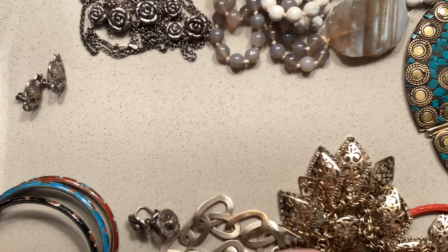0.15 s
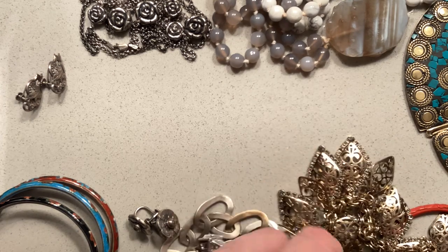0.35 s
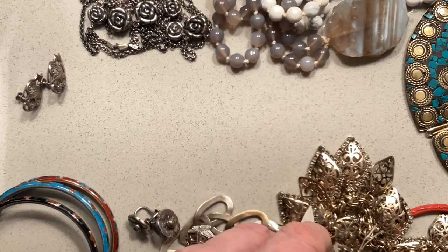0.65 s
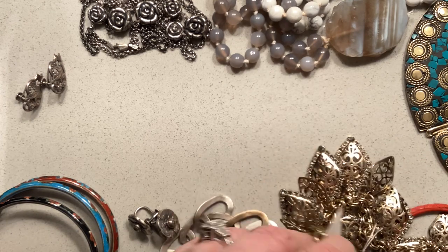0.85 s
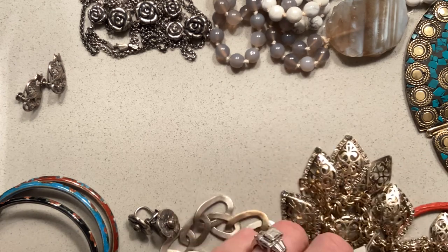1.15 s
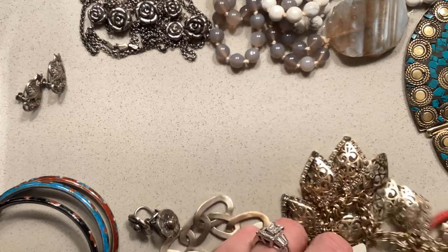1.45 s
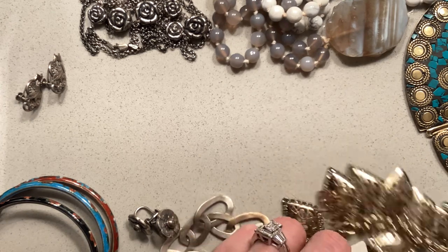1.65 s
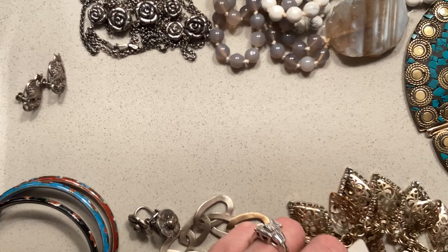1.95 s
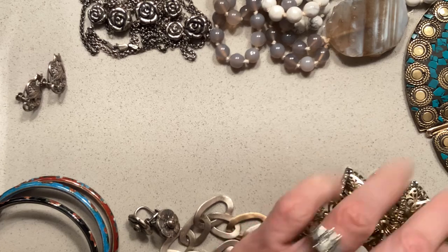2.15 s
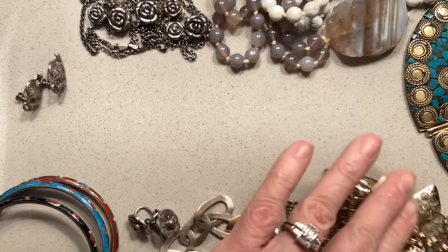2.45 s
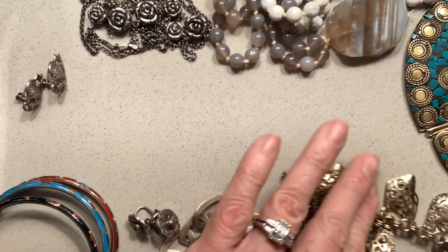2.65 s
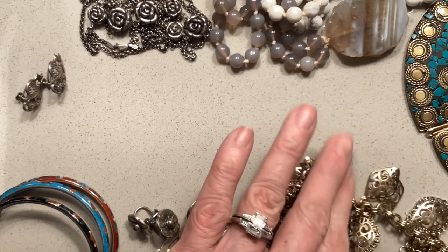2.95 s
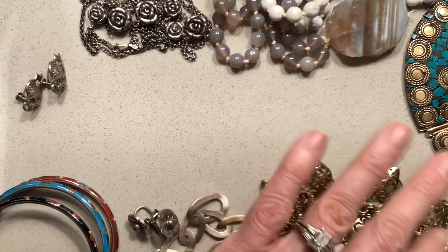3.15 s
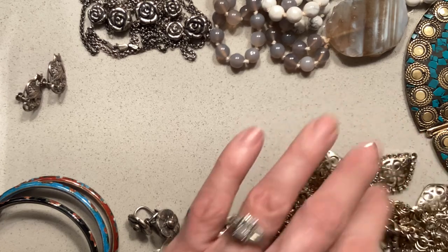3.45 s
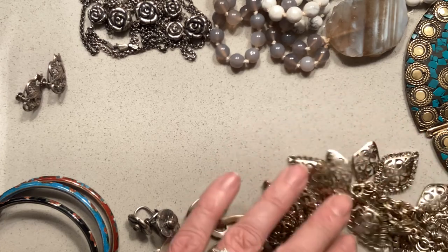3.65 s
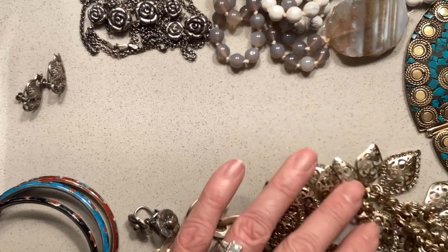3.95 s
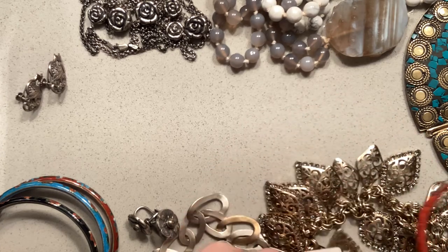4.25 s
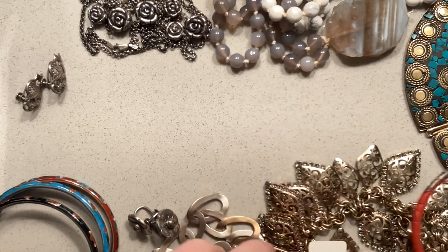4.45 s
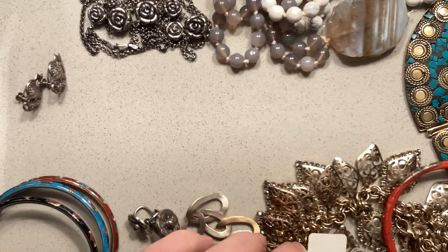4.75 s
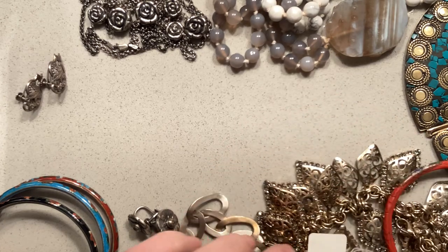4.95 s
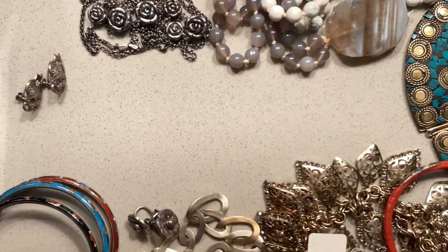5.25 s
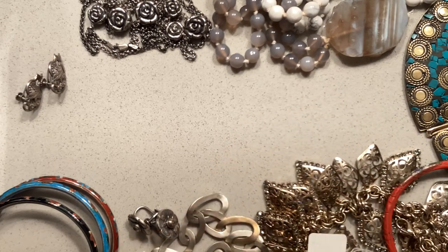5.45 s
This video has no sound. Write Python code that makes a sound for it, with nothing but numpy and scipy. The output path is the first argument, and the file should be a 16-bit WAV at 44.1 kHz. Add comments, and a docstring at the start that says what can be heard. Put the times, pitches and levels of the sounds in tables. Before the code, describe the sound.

Thin metal leaves and links click, scrape and jingle irregularly on a counter in a quiet room, then a chain drops sharply.

```python
"""Metal necklace pushed over a countertop

A hand pushes metal leaves and chain links over a counter. Noise-like grains make the rustle and fizz of dragging;
short noise bursts and decaying sines make link clicks, edge skids and leaf slaps; gliding sines make squeaks.
At last a length of chain drops in two bright clatters. Resonators ring the leaves and the counter.
A small dry room answers with decaying noise and hums faintly.
"""
import sys
import numpy as np
from scipy import signal
from scipy.fft import rfft, irfft, next_fast_len
from scipy.io import wavfile
from scipy.ndimage import map_coordinates

SR = 44100
rng = np.random.default_rng(int(sys.argv[2]) if len(sys.argv) > 2 else 0)


def master(y):
    """Save y as 16-bit WAV."""
    cut = np.clip(np.atleast_2d(y).T, -1, 1)
    pcm = np.round(cut * 32767)  # scale
    wavfile.write(sys.argv[1], SR, pcm.astype(np.int16))


N = 246164
TIME = np.arange(N) / SR
TOP_HZ = 15680  # band limit

# hand pushes: (start [s], length [s], rustle [dB], fizz [dB], weight on the counter [dB])
PUSH_EVENTS = [(0.0, 0.068, -62, -67, -73.5), (0.105, 0.0039, -48.5, -57.5, -54),
               (0.147, 0.28, -61.5, -64.5, -72), (0.194, 0.014, -72, -70, -68),
               (0.297, 0.05, -55.5, -70, -56.5), (0.519, 0.16, -63, -78, -63.5),
               (0.529, 0.07, -51, -57.5, -59), (0.772, 0.02, -45.5, -51.5, -48.5),
               (0.858, 0.068, -51, -51, -54), (1.026, 0.072, -60, -47.5, -71),
               (1.061, 0.057, -44, -52.5, -51), (1.219, 0.067, -63, -64, -54.5),
               (1.316, 0.057, -59.5, -82, -61.5), (1.427, 0.49, -51, -57.5, -58.5),
               (1.483, 0.052, -47, -44, -46.5), (1.667, 0.023, -44, -58, -57.5),
               (1.744, 0.012, -47.5, -52, -56), (1.811, 0.0055, -54, -69, -48.5),
               (1.932, 0.082, -60, -55, -61.5), (2.096, 0.043, -65.5, -87, -68),
               (2.19, 0.06, -59, -66, -70.5), (2.248, 0.0075, -42, -55, -51.5),
               (2.27, 0.08, -50.5, -55, -54.5), (2.339, 0.014, -46, -35, -56),
               (2.345, 0.32, -50, -59.5, -52.5), (2.444, 0.0023, -43.5, -42, -41.5),
               (2.571, 0.22, -51, -52, -64.5), (2.7, 0.061, -44, -44.5, -46.5),
               (2.766, 0.14, -51, -58.5, -58), (2.966, 0.011, -55.5, -52, -57),
               (3.013, 0.045, -50.5, -53, -54.5), (3.159, 0.22, -53, -68, -60.5),
               (3.185, 0.022, -48.5, -60, -56.5), (3.33, 0.017, -49, -50, -53),
               (3.613, 0.0099, -38.5, -49, -45), (3.634, 0.091, -51.5, -56.5, -60.5),
               (3.919, 0.006, -61, -51, -53.5), (3.947, 0.0036, -44, -64, -56.5),
               (4.198, 0.076, -56.5, -61, -66), (4.298, 0.01, -46.5, -44, -44),
               (4.323, 0.098, -74, -62, -88), (4.479, 0.05, -57, -71, -63.5),
               (4.527, 0.008, -50, -46, -43.5), (4.549, 0.058, -65.5, -52.5, -59.5),
               (4.635, 0.095, -65.5, -70, -59), (4.723, 0.008, -48, -53, -51.5)]
# chain lengths landing: (time [s], length [s], first link level [dB], chime against clack [dB])
CHAIN_FALLS = [(4.746, 0.029, -9.5, -2), (4.7819, .04, -6, 4.5)]
# leaf resonances: (frequency [Hz], width [Hz], level [dB])
LEAF_RESONANCES = [(1085, 55, -4.5), (1420, 160, -11), (2055, 30, -1.5), (2118, 30, -3), (2615, 35, 0),
                   (3320, 50, -7), (3840, 50, -2), (4380, 50, -6), (5030, 50, -2), (5230, 55, 3),
                   (5630, 60, -1), (6330, 50, -1), (6930, 60, -3), (7940, 85, -2)]
# spectrum of the counter: (frequency [Hz], level [dB])
COUNTER_COLOUR = [(110, -19), (170, 4), (240, -1.5), (330, 8), (450, -1.5), (750, 3), (1100, -9.5),
                  (1500, -1), (2400, -21)]
# spectrum of loose links and edge cracks: (frequency [Hz], level [dB])
JINGLE_COLOUR = [(1500, 0), (2600, 1.5), (6000, -1), (9000, -4.5), (15000, -3.5)]


def amp(db):
    """Decibels to gain."""
    return 10 ** (np.asarray(db) / 20)


def unit(x):
    """Scale to rms 1."""
    return x / np.sqrt(np.mean(x ** 2) + 1e-20)


def to_peak(x):
    """Scale to a peak of 1."""
    return x / np.abs(x).max()


def along(points, hz):
    """Interpolate (Hz, value) points on a log frequency axis."""
    f, v = np.transpose(points)
    return np.interp(np.log(hz + 1), np.log(f + 1), v)


def fade(t, t60):
    """Exponential decay, 60 dB down after t60."""
    return np.exp(-np.log(1000) * t / np.maximum(t60, 1e-4))


def add(track, s, x):
    """Mix x into the track from time s."""
    part = track[max(round(s * SR), 0):][:len(x)]
    part += x[:len(part)]


def random_sign(shape=None):
    """Random polarity."""
    return rng.choice([-1, 1], shape)


def filtered(x, response):
    """x times a complex response of frequency."""
    size = next_fast_len(len(x) + 8192)
    spectrum = rfft(x, size) * response(np.fft.rfftfreq(size, 1 / SR))
    return irfft(spectrum, size)[:len(x)]


def coloured(x, points, size=2048):
    """x through a minimum-phase filter with the given spectrum, falling away below its first point."""
    hz = np.fft.rfftfreq(size, 1 / SR)
    gain = amp(along(points, hz)) * np.minimum(hz / points[0][0], 1) ** 2
    # fold the cepstrum to make the filter causal
    cepstrum = irfft(np.log(np.maximum(gain, 1e-6)))
    cepstrum[1:size // 2] *= 2
    cepstrum[size // 2 + 1:] = 0
    impulse_response = irfft(np.exp(rfft(cepstrum)))
    return signal.fftconvolve(x, impulse_response)[:len(x)]


def resonant(x, modes):
    """The ringing of a body with the given modes when x shakes it."""
    def response(f):
        return sum(amp(db) * 1j * f * width / (centre ** 2 - f * f + 1j * f * width)
                   for centre, width, db in modes)
    return filtered(x, response)


def wobble(rate):
    """A smooth random curve, rate knots a second."""
    return map_coordinates(rng.standard_normal(int(N * rate / SR) + 4), [TIME * rate])


def grains(rate, spread_db):
    """Tiny random impacts of uneven size, rate a second."""
    hit = rng.random(N) < rate / SR
    size = amp(spread_db * np.minimum(rng.standard_exponential(N), 3))
    return hit * size * np.sign(rng.standard_normal(N))


def burst(t60, size=4096):
    """The dense, quickly dying vibration of a small struck part, as decaying noise."""
    return rng.standard_normal(size) * fade(np.arange(size) / SR, t60)


def link_ring(t60, order=40, size=4096):
    """Small-link ringing: sines of random pitch, each with its own damping."""
    t = np.arange(size) / SR
    hz = rng.uniform(1500, TOP_HZ, (order, 1))
    life = t60 * np.exp(0.055 * rng.standard_normal((order, 1)))
    partials = rng.standard_normal((order, 1)) * np.sin(2 * np.pi * hz * t) * fade(t, life)
    return unit(partials.sum(0))


def chatter(x, gap_s=0.0015, loss_db=2.5, count=4):
    """A part rebounds a few times within milliseconds, weaker each time."""
    delays = np.cumsum(gap_s * rng.uniform(0.47, 2.0, count))
    out = x.copy()
    for k, delay in enumerate(delays):
        rebound = np.pad(x, (int(delay * SR), 0))[:len(x)]
        out += amp(-loss_db * (k + 3.5)) * random_sign() * rebound
    return out


def room_tone(level_db=-61, waver_db=-0.5):
    """Low, slightly uneven ventilation rumble with a trace of hiss, as shaped noise."""
    # (frequency [Hz], level [dB])
    tone_colour = [(25, -47), (42, -28), (56, -7), (90, -1), (120, 1), (170, -5), (290, -16), (450, -29),
                   (900, -30.5), (1800, -29.5), (2600, -32.5), (6000, -38.5), (12000, -44), (16000, -50)]
    noise = unit(filtered(rng.standard_normal(N), lambda hz: amp(along(tone_colour, hz))))
    low = filtered(noise, lambda hz: hz < 300)
    return amp(level_db) * (noise + low * (amp(waver_db * wobble(8.5)) - 1))


def room(x, build_up_s=0.0071, far_db=-26, far_t60_s=0.21):
    """Nearby surfaces return a short, dense answer; the far walls a faint, longer one."""
    # decay of the near answer: (frequency [Hz], t60 [s])
    near_decay = [(150, 0.33), (400, 0.2), (1000, 0.13), (2500, 0.046), (6000, 0.034), (14000, 0.055)]
    hz, t, z = signal.stft(rng.standard_normal(SR // 2), SR, nperseg=256)
    near = fade(t, along(near_decay, hz)[:, None])
    far = amp(far_db) * fade(t, far_t60_s)
    tail = signal.istft(z * (near + far), SR, nperseg=256)[1]
    tail *= 1 - np.exp(-(np.arange(len(tail)) / SR / build_up_s) ** 2)
    return signal.fftconvolve(x, tail / np.linalg.norm(tail))[:N]


def knocks(t60_s=0.065, lag_s=0.0038, fall_db=-37.5):
    """The counter answers the start of each push and each chain fall with a dull noise burst."""
    out = np.zeros(N)
    blows = [(s + lag_s, weight_db) for s, *_, weight_db in PUSH_EVENTS]
    blows += [(s, fall_db) for s, *_ in CHAIN_FALLS]
    for s, db in blows:
        add(out, s, amp(db) * to_peak(coloured(burst(t60_s, size=8192), COUNTER_COLOUR)))
    return out


def squeaks(waver_hz=70):
    """A sticking and slipping edge sings for a moment on one unsteady high mode."""
    # (time [s], length [s], mean pitch [Hz], level [dB])
    squeak_events = [(1.75, 0.021, 15050, -39), (1.83, 0.009, 14100, -36.5), (2.649, 0.021, 14000, -41),
                     (3.335, 0.016, 14900, -39), (3.616, 0.0093, 14400, -36), (3.625, 0.01, 14700, -40.5),
                     (3.626, 0.0068, 11400, -33)]
    out = np.zeros(N)
    for s, length, hz, db in squeak_events:
        t = np.arange(int(length * SR)) / SR
        pitch = hz + waver_hz * map_coordinates(rng.standard_normal(64), [t * 500])
        swell = np.sqrt(np.abs(np.sin(np.pi * t / length)))
        add(out, s, amp(db) * swell * np.sin(2 * np.pi * np.cumsum(pitch) / SR))
    return out


def skids(gap_s=0.0014, edge_t60_s=0.009, crack_db=-3, crack_t60_s=0.0022, scatter_db=2, size=2048):
    """An edge skids over a leaf: a swelling, fading roll of contacts strikes its short, inharmonic modes."""
    # (time [s], length [s], level [dB], nominal lowest mode [Hz])
    skid_events = [(0.096, 0.015, -40.5, 2600), (0.531, 0.0049, -43, 3100), (0.56, 0.0067, -42.5, 3380),
                   (0.862, 0.012, -42, 2460), (0.874, 0.0085, -25, 2478), (1.022, 0.004, -29.5, 2780),
                   (1.077, 0.012, -27, 3340), (1.112, 0.007, -24.5, 3350), (1.498, 0.027, -30, 3170),
                   (1.829, 0.0058, -36, 3230), (1.979, 0.008, -32, 4350), (2.249, 0.0094, -28.5, 3330),
                   (2.352, 0.011, -29, 2980), (2.443, 0.011, -33, 2300), (2.71, 0.0073, -28.5, 2070),
                   (2.732, 0.0065, -34, 3240), (3.607, 0.013, -30, 2080), (3.952, 0.0075, -26.5, 2340),
                   (4.194, 0.0039, -26.5, 3410), (4.229, 0.0063, -22, 3890), (4.482, 0.011, -38, 3360),
                   (4.534, 0.0085, -33, 3250)]
    # (multiple of the lowest mode, level [dB])
    edge_modes = [(1, -2), (1.63, 0), (2.12, -1), (2.65, -3), (3.7, -8.5)]
    out = np.zeros(N)
    t = np.arange(size) / SR
    ratio, level = np.transpose(edge_modes)[:, :, None]
    for s, length, db, lowest_hz in skid_events:
        hz = lowest_hz * ratio * (1 + .025 * rng.standard_normal(ratio.shape))
        delays = np.r_[0, np.cumsum(gap_s * rng.uniform(.5, 1.5, 40))]
        shape = (len(delays), len(ratio), 1)
        strikes = amp(level + scatter_db * rng.standard_normal(shape)) * random_sign(shape)
        crack = amp(crack_db) * coloured(burst(crack_t60_s, size), JINGLE_COLOUR)
        roll = np.zeros(2 * size)
        for delay, strike in zip(delays[delays < length], strikes):
            ring = (strike * np.sin(2 * np.pi * hz * t)).sum(0) * fade(t, edge_t60_s)
            swell = np.sin(np.pi * (delay + gap_s) / (length + 2 * gap_s))
            add(roll, delay, swell * (ring + crack))
        add(out, s, amp(db) * to_peak(roll))
    return out


def slaps(contact_t60_s=0.00065, scrape_db=-9, bloom_s=0.0018, scatter_db=5.0, size=8192):
    """A leaf lands flat with a sharp, broad clack; its modes bloom and ring out, differently each time."""
    # (time [s], clack level [dB], ringing level [dB])
    slap_events = [(0.881, -25, -36.5), (2.2527, -43, -41), (2.431, -10.5, -22), (2.6998, -18.5, -26),
                   (2.7554, -40, -35), (2.8731, -22.5, -37), (3.6078, -19, -42), (3.925, -30, -37),
                   (3.9526, -26.5, -57), (4.755, -26, -32.5), (4.796, -23, -29)]
    # (frequency [Hz], level [dB])
    slap_colour = [(600, -21), (1100, -11), (2300, 3), (2800, -5), (4200, -4.5), (6500, -1), (8500, -19),
                   (15000, -15)]
    damping_hz = 6.6  # width that lying on the counter adds to a 1 kHz mode; grows with pitch squared
    out = np.zeros(N)
    t = np.arange(size) / SR
    hz, width, level = np.transpose(LEAF_RESONANCES)[:, :, None]
    decay = np.exp(-np.pi * (width + damping_hz * (hz / 1000) ** 2) * t)
    bloom = 1 - np.exp(-t / bloom_s)
    for s, clack_db, ring_db in slap_events:
        contact = signal.unit_impulse(size) + amp(scrape_db) * burst(contact_t60_s, size)
        clack = to_peak(chatter(coloured(contact, slap_colour)))
        sizes = amp(level + scatter_db * rng.standard_normal(hz.shape)) * random_sign(hz.shape)
        ring = (sizes * np.sin(2 * np.pi * hz * t) * decay).sum(0) * bloom
        add(out, s, amp(clack_db) * clack + amp(ring_db) * .5 * ring)
    return out


def chain_drop(clack_t60_s=0.023, chime_t60_s=0.0049, crack_t60_s=0.0027, crack_db=-12,
               scatter_db=1, count=10):
    """Link after link cracks onto the counter, clacks and chimes high up, ever more softly."""
    # both: (frequency [Hz], level [dB])
    clack_colour = [(300, -14.5), (1500, -12.5), (3000, -13), (4200, -8.5), (5600, -1), (7300, -8.5),
                    (8300, 1.5), (10500, -5), (14000, -15), (16000, -6)]
    chime_colour = [(7000, -32), (10750, -20), (11150, 0), (12000, -4), (13000, -7), (13900, -20),
                    (16000, -28)]
    link_gap_s, follow_db, settle_db_per_s = .005, -6, 153.5
    out = np.zeros(N)
    for s, length, db, chime_db in CHAIN_FALLS:
        for k in range(count):
            delay, follower_db = 0, 0
            if k:
                delay = link_gap_s * (k + rng.uniform(-.35, .35))
                follower_db = follow_db - settle_db_per_s * delay + scatter_db * rng.standard_normal()
            clack = unit(coloured(burst(clack_t60_s), clack_colour))
            crack = unit(coloured(burst(crack_t60_s), clack_colour))
            chime = unit(coloured(burst(chime_t60_s), chime_colour))
            link = to_peak(clack + amp(crack_db) * crack + amp(chime_db) * chime)
            add(out, s + delay, (delay < length) * amp(db + follower_db) * link)
    return out


def clicks(tick_t60_s=0.0042, ring_t60_s=0.022, graze_t60_s=0.0184, note_cycles=100, overtone_db=-6,
           tick_db=-3, ring_db=-18, graze_db=-19):
    """Links graze, meet in a chatter of sharp ticks, then ring on a main note and an inharmonic overtone."""
    # (time [s], level [dB], main note [Hz], tilt [dB per octave], lowest link frequency [Hz])
    contact_events = [(0.0094, -42.5, 5200, -1, 2000), (0.0336, -41, 5130, -4, 2500),
                      (0.096, -36.5, 5000, 2.5, 900), (0.183, -35, 8000, -6, 1510),
                      (0.1944, -35, 7910, -4, 1540), (0.2872, -38, 5240, 6, 1500),
                      (0.3341, -40, 10900, 8, 4000), (0.3494, -44, 11900, 3, 4000),
                      (0.394, -37, 5120, -2, 1500), (0.512, -44, 5200, -4.5, 900),
                      (0.5462, -31, 5080, 24, 1500), (0.5986, -36, 4040, 13, 1500),
                      (0.651, -39.5, 5340, -7, 1500), (0.7655, -35, 2065, -6, 890),
                      (0.7748, -38, 3760, 0, 1800), (0.8645, -29.5, 2380, -7, 2000),
                      (0.8824, -26, 2027, -10.5, 1640), (0.973, -33, 2590, -12.5, 2520),
                      (0.995, -37.5, 2600, -6, 2500), (1.008, -27, 2760, -3, 2700),
                      (1.0399, -32, 2460, -3, 2400), (1.113, -21.5, 9740, -3, 2620),
                      (1.217, -46, 5200, -10, 1200), (1.2481, -47, 5600, 2, 1200),
                      (1.272, -36, 6240, -6.5, 1800), (1.3188, -28.5, 5000, 3.5, 4180),
                      (1.326, -35, 5760, -4, 4500), (1.333, -37, 6560, 5, 4500),
                      (1.4857, -32, 6260, -4, 3000), (1.502, -33, 5600, 4, 2000),
                      (1.53, -33, 10900, 2, 3000), (1.6005, -36, 11400, 4, 4970),
                      (1.637, -39, 7900, 1, 5000), (1.6727, -29.5, 10950, -5, 5000),
                      (1.6801, -32.5, 7000, -13.5, 5060), (1.6845, -42, 7060, -6, 5500),
                      (1.695, -31, 6850, 1, 3000), (1.716, -32.5, 6900, -9, 4000),
                      (1.804, -29.5, 3930, -8, 1190), (1.8323, -28, 7550, -4.5, 1510),
                      (1.847, -43, 5540, 9, 3000), (1.888, -34.5, 5760, -11, 1500),
                      (1.966, -26, 5030, 19, 3000), (1.9669, -18.5, 7500, -4.5, 2920),
                      (1.9732, -26, 7800, -4, 3950), (1.98, -28, 7100, -3, 4000),
                      (2.006, -34.5, 5200, 3, 3060), (2.1932, -43, 3920, -4.5, 2060),
                      (2.2545, -27, 4100, -1.5, 1610), (2.3405, -43, 10500, -3, 3000),
                      (2.349, -21, 13400, 10, 4000), (2.3554, -27, 6300, -7, 1840),
                      (2.4521, -25.5, 2670, 5, 1800), (2.502, -28, 5360, -3, 2000),
                      (2.5159, -25.5, 3690, -6.5, 1480), (2.596, -42, 10900, 6, 4000),
                      (2.626, -27, 5500, 20, 2980), (2.64, -32.5, 9200, 3, 3950),
                      (2.6993, -23, 7260, 8, 3000), (2.793, -28, 5300, 6, 2000),
                      (2.819, -38, 9100, 3, 3520), (2.872, -27, 5050, -4.5, 2000),
                      (2.8852, -30, 5040, -8, 2000), (2.9801, -30, 5870, -6, 1980),
                      (3.0164, -33.5, 2020, -9.5, 1180), (3.0312, -31, 5460, -4, 1520),
                      (3.0835, -39, 5560, -7, 2000), (3.1581, -31.5, 5200, -2, 1500),
                      (3.189, -26.5, 3900, -7.5, 3050), (3.609, -21, 6180, 5, 1500),
                      (3.6235, -20, 11240, -3.5, 1500), (3.697, -24, 5900, -4, 3470),
                      (3.7113, -23.5, 5560, -7, 3440), (3.7944, -41, 5100, -5.5, 1530),
                      (3.92, -29.5, 5700, -5.5, 1140), (3.9535, -25, 11820, 0.5, 2490),
                      (4.1835, -40, 5070, -1.5, 3020), (4.197, -20.5, 8830, -5.5, 3300),
                      (4.215, -34, 8600, -6, 3960), (4.2242, -23.5, 6900, -4, 3300),
                      (4.231, -19, 12400, 0, 3460), (4.2434, -35.5, 7760, -14, 3280),
                      (4.3056, -26, 9900, 4, 1500), (4.3924, -29, 4750, -2, 2500),
                      (4.408, -39.5, 8200, -4, 4000), (4.419, -34.5, 5300, -2.5, 3020),
                      (4.432, -40, 7540, -6, 3000), (4.444, -43, 8500, -5, 4000),
                      (4.4585, -35, 6050, -3, 3020), (4.476, -36, 4950, -3, 3050),
                      (4.4934, -31, 5300, -9, 3050), (4.523, -33.5, 4200, -1, 1960),
                      (4.5316, -26, 9140, 11, 2000), (4.651, -35.5, 5300, -3.5, 3060),
                      (4.66, -40.5, 7650, -4, 4000), (4.6747, -33.5, 5130, -6, 2500)]
    # (frequency [Hz], level [dB])
    link_colour = [(700, -3), (1600, -3.5), (2800, -6), (5000, 0.5), (7500, 1), (10500, -1), (15500, -3.5)]
    # note level, stronger or weaker by pitch: (main note [Hz], level [dB])
    note_levels = [(2000, -13), (2700, -9.5), (5000, -12.5), (11000, -5)]
    low_cut_db_per_octave, low_cut_depth_db = 22, 26.5  # a small link gives off little below its lowest
    note_lift_db, note_width_octaves = 8.5, 0.12  # a contact is strongest around its main note
    out = np.zeros(N)
    grid = np.geomspace(700, 16000, 24)
    for s, db, hz, tilt, lowest_hz in contact_events:
        octaves = np.log2(grid / hz)
        low_cut = np.clip(low_cut_db_per_octave * np.log2(lowest_hz / grid), 0, low_cut_depth_db)
        note_lift = note_lift_db * np.exp(-(octaves / note_width_octaves) ** 2)
        colour = np.c_[grid, along(link_colour, grid) - low_cut + tilt * octaves + note_lift]

        strike = link_ring(tick_t60_s, order=12) + .5 * unit(burst(tick_t60_s))
        tick = to_peak(chatter(coloured(strike, colour)))
        ring = coloured(link_ring(ring_t60_s), colour)
        ring /= np.std(ring[:441])  # level over the first 10 ms

        t = np.arange(len(ring)) / SR
        overtone_hz = min(hz * rng.uniform(1.25, 1.8), TOP_HZ)
        note = sum(amp(part_db) * np.sin(2 * np.pi * f * t) * fade(t, note_cycles / f)  # lower rings longer
                   for f, part_db in [(hz, 0), (overtone_hz, overtone_db)])
        graze = to_peak(coloured(burst(graze_t60_s), colour))[::-1]  # swells up to the contact
        contact = amp(tick_db) * tick + amp(ring_db) * ring + amp(along(note_levels, hz)) * note
        add(out, s + 0.00087, amp(db) * contact)
        add(out, s + 0.00063 - len(graze) / SR, amp(db + graze_db) * graze)
    return out


def jingle(rate=10, ring_t60_s=0.029, spread_db=3.0, crack_db=-3, count=20):
    """Loose links tap at random, each with its own few modes; rate taps a second per link."""
    taps = np.zeros(N)
    for _ in range(count):
        ring = link_ring(ring_t60_s, order=8) + amp(crack_db) * unit(burst(0.0012))
        taps += signal.oaconvolve(grains(rate, spread_db), ring)[:N]
    return unit(coloured(taps, JINGLE_COLOUR))


def effort(levels_db, grip_s, release_t60_s):
    """Summed gain of all pushes: each takes up the slack, grips, eases off over its length and dies away."""
    grip_share, ease_db = 0.037, 1.5  # longer pushes take hold more slowly
    slack_db, slack_t60_s = -12, 0.04  # the chain stirs as its slack is taken up
    power, t = np.zeros(N), np.arange(-SR // 2, SR) / SR
    slack = amp(slack_db) * fade(np.abs(t), slack_t60_s)
    for (s, length, *_), db in zip(PUSH_EVENTS, levels_db):
        grip = np.clip(t / (grip_s + grip_share * length), 0, 1)
        held = amp(db + ease_db * (1.5 - np.clip(t / length, 0, 1)))
        release = fade(np.maximum(t - length, 0), release_t60_s)
        gain = np.maximum(grip, slack) * held * release
        power += np.interp(TIME, s + t, gain, 0, 0) ** 2
    return np.sqrt(power)


def sliding(rustle_db=-7.0, fizz_db=-5.0, rumble_db=-9, loose_db=-2.5, unsteady_db=2.0):
    """Dragged metal catches on the counter grain in countless tiny impacts and shakes the loose links."""
    # both: (frequency [Hz], level [dB])
    rustle_colour = [(700, -15), (1000, 2), (1600, 2.5), (2050, 8), (2400, -3.5), (3000, -0.5), (3900, 2),
                     (5200, 1), (6600, -1), (7600, -7.5), (9500, -14.5), (14000, -32)]
    fizz_colour = [(7000, -46.5), (9500, -4), (11500, -11), (13000, -11.5), (14700, -7), (16000, -4.5)]
    _, _, rustles, fizzes, weights = np.transpose(PUSH_EVENTS)
    unsteady = amp(unsteady_db * wobble(45))
    rustle_gain = unsteady * effort(rustles, grip_s=0.0024, release_t60_s=0.14)
    fizz_gain = unsteady * effort(fizzes, grip_s=0.0024, release_t60_s=0.14)
    rumble_gain = effort(weights, grip_s=0.0028, release_t60_s=0.21)

    catches = grains(rate=2800, spread_db=4) * amp(2.4 * wobble(120))
    rustle = rustle_gain * amp(rustle_db) * unit(coloured(catches, rustle_colour))
    fizz = fizz_gain * amp(fizz_db) * unit(coloured(catches, fizz_colour))
    rumble = rumble_gain * amp(rumble_db) * unit(coloured(catches, COUNTER_COLOUR))
    loose_links = amp(loose_db) * np.sqrt(rustle_gain * fizz_gain) * jingle()
    return loose_links + rustle + fizz + rumble


def leaves_ringing(x, touch_db=3.5, touch_rate=13, leaf_db=-4, count=2):
    """Leaves tuned slightly apart ring; fingers and neighbours damp and free them, so modes come and go."""
    out = np.zeros(N)
    for hz, width, db in LEAF_RESONANCES:
        for k in range(count):
            mode = (hz * (1 + .06 * k * rng.uniform(-1, 1)), width, db + leaf_db)
            touch = amp(touch_db * (np.tanh(wobble(touch_rate)) * 2.3 - 0.5))
            out += touch * resonant(x, [mode])
    return out


def scene(struck_db=-6, dragged_db=5, counter_db=3, near_db=1.5, room_db=-6):
    """Contacts and dragging set the leaves ringing; the counter carries everything into the room."""
    # counter resonances: (frequency [Hz], width [Hz], level [dB])
    counter_modes = [(236, 24, 2), (320, 24, -7), (366, 14, -2), (397, 14, -2), (517, 18, 4), (625, 40, -7),
                     (890, 45, -2)]
    contacts = clicks() + skids() + chain_drop() + squeaks()
    drag = sliding()
    leaves = leaves_ringing(amp(struck_db) * contacts + amp(dragged_db) * drag)
    near = contacts + drag + leaves + slaps() + knocks()
    near = near + amp(counter_db) * resonant(near, counter_modes)
    return (amp(near_db) * near + amp(room_db) * room(near) + room_tone())[None]


def record(dry):
    """The recorder rolls off very steeply above its band limit."""
    return filtered(dry[0], lambda hz: 1 / np.sqrt(1 + (hz / TOP_HZ) ** 140))[None]


dry = scene()
out = record(dry)
master(out)
```